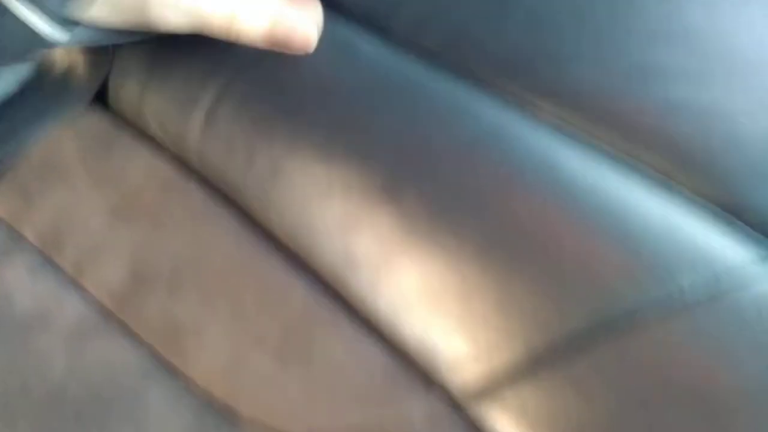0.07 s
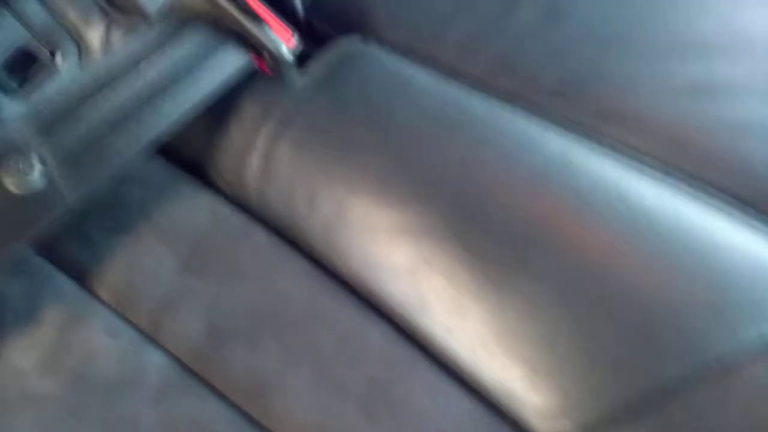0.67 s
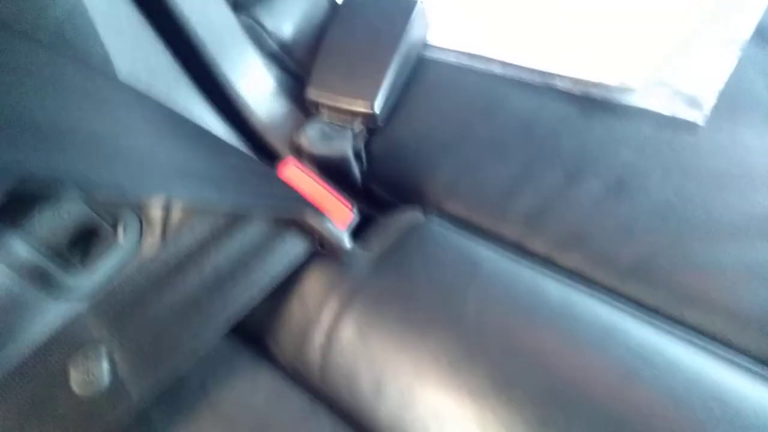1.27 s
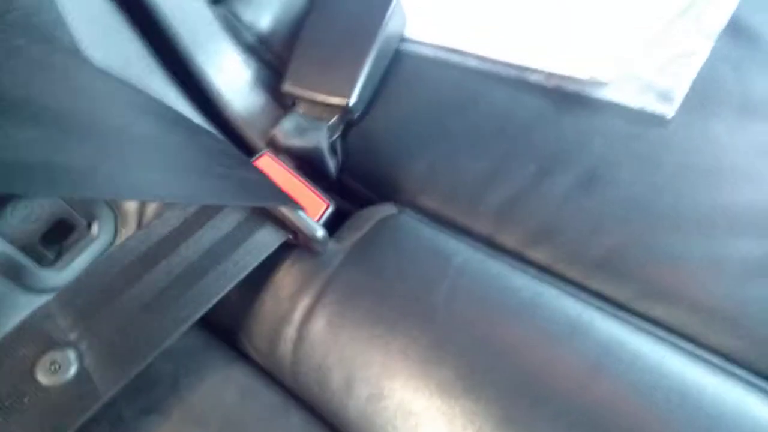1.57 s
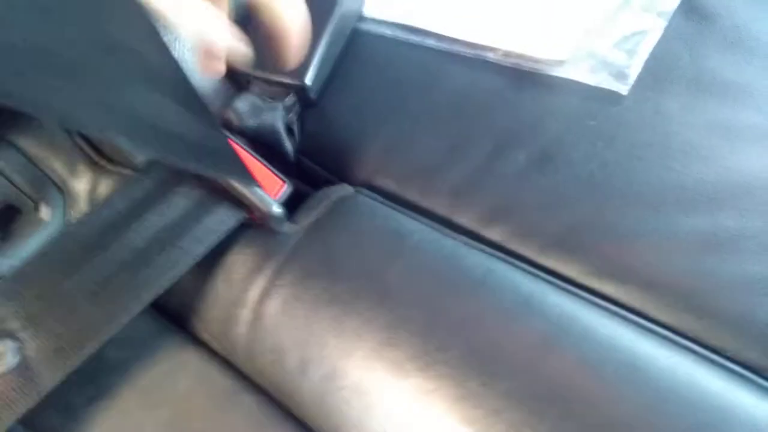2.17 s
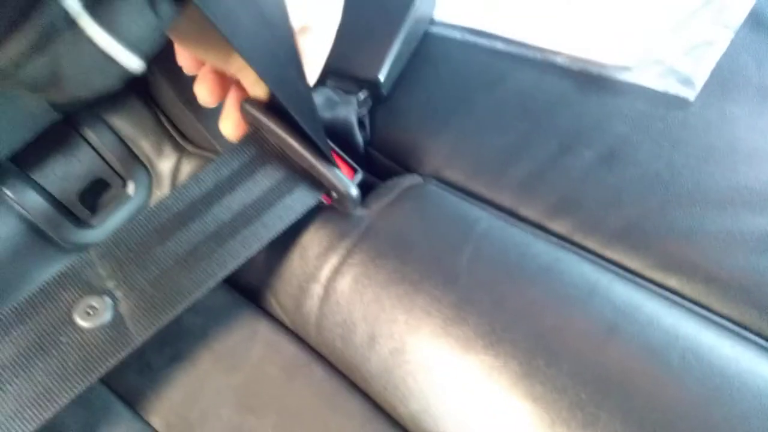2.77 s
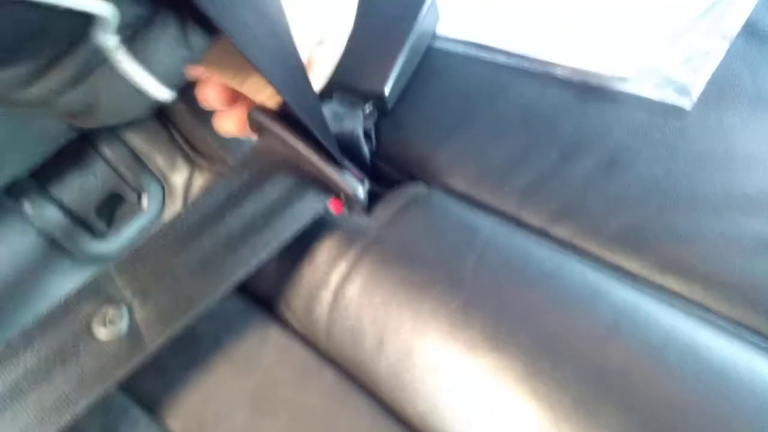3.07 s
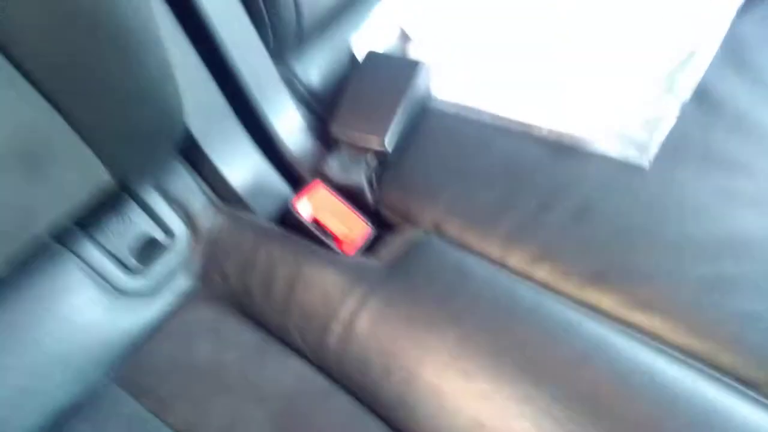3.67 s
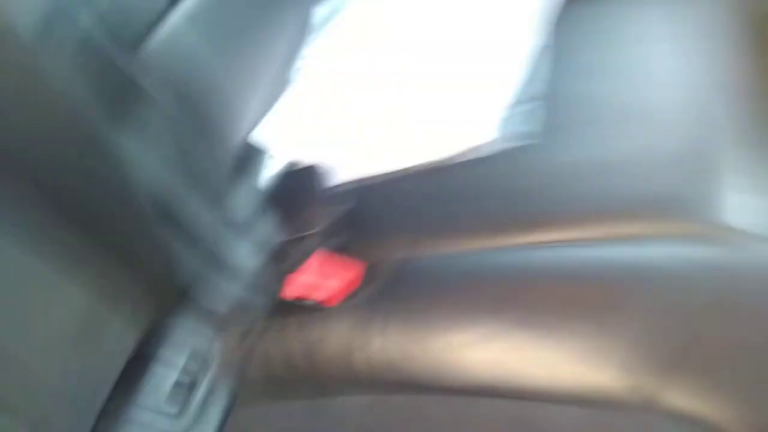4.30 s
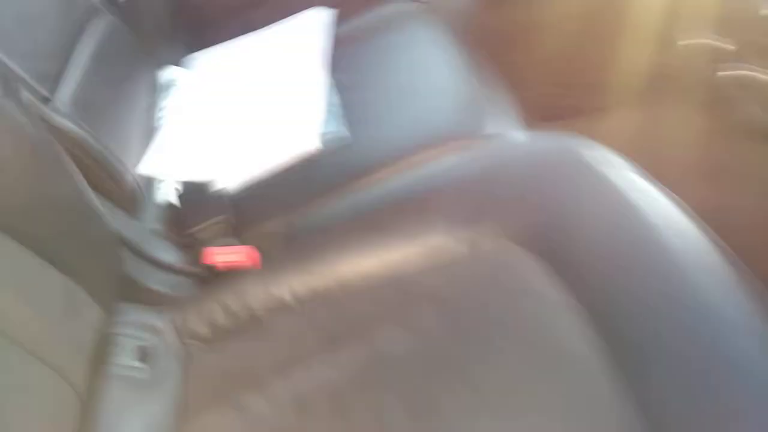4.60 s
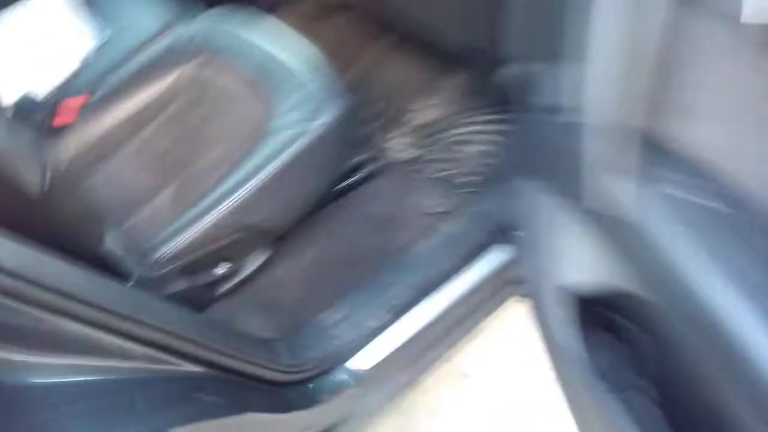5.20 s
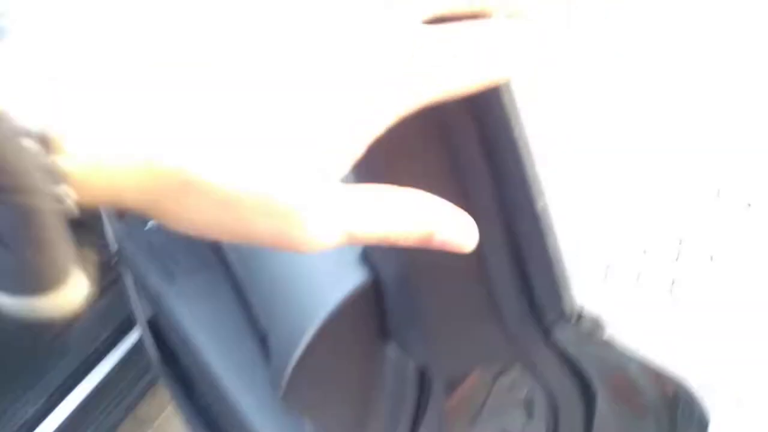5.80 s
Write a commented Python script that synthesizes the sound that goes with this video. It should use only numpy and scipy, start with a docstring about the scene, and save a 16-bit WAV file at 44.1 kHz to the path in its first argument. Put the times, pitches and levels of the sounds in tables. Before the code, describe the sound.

Inside a parked car, a seat belt latches with a sharp metallic click. The strap rustles as it is tugged, then the buckle releases in a cluster of clicks and the belt hisses back onto a briefly whirring reel, its tongue smacking the plastic trim. Clothes rustle as someone moves, and a finger rubs and taps the close microphone on the right, over a faint low outdoor rumble.

```python
"""Inside a parked car, a seat belt is latched, tugged and released. Its steel tongue clicks and rings in
the buckle, the woven strap hisses back onto a whirring reel, and the tongue smacks the plastic trim.
Then someone moves out of the car, clothes rustling, while a finger rubs and taps the right
microphone's opening (its port). A low outdoor rumble lies under it all."""
import sys
import numpy as np
from scipy import signal
from scipy.fft import rfft, irfft, next_fast_len
from scipy.io import wavfile
from scipy.ndimage import uniform_filter1d, map_coordinates

SR = 44100
rng = np.random.default_rng(int(sys.argv[2]) if len(sys.argv) > 2 else 0)


def store_wav(level_fs):
    """Save 16-bit WAV to argv[1]."""
    pcm = np.round(np.clip(np.atleast_2d(level_fs), -1, 1) * 32767)
    wavfile.write(sys.argv[1], SR, pcm.T.astype(np.int16))


N = 266805
TIME = np.arange(N) / SR
AGE = np.arange(SR // 4) / SR  # seconds since a hit

# Table levels are relative. A higher tilt_db is brighter; decay_s is the time to fade by 60 dB.
# Ringing tones of the steel tongue and latch: pitch_hz, level_db, decay_s
STEEL_TONES = [(2890, -3, 0.05), (3070, -6, .04), (3435, 2.5, 0.048), (4250, -6, 0.035), (4520, -4, 0.045),
               (4800, -1, 0.045), (5230, -1, 0.045), (5600, -5, 0.035), (5950, -7, 0.03), (6460, -2, 0.045),
               (6860, -6, 0.035), (7670, 1, 0.025), (7865, -2, 0.025), (8820, -11, 0.05), (9670, -12, 0.05)]
# Ringing tones of the hollow buckle case: pitch_hz, level_db, decay_s
CASE_TONES = [(1284, -2, 0.046), (1360, -3, .03), (1447, -5, 0.035), (1600, -11, .025)]
# Tone colour of the rubbing strap: pitch_hz, level_db
STRAP_COLOUR = [(300, -46.5), (1000, -24.5), (1800, -7.5), (2300, -6.5), (3200, -0.5), (4300, -2),
                (5500, -1), (7500, 1.5), (10000, -4), (13000, -12.5), (16000, -21)]
# Shifts of the body on the seat: start_s, length_s, rustle_db, growth_db, tilt_db, rumble_db
BODY_MOVES = [(0.0, 0.51, -62.5, -14, 2.5, -59.5), (0.312, 0.16, -50, 4, 0, -48.5),
              (0.521, 0.11, -62.5, 16, 2.5, -56.5), (1.617, 0.38, -81, 0, -3.5, -64.5),
              (2.012, 0.52, -60, -11, 1.5, -64), (3.058, 0.84, -55.5, 1.5, 2.5, -61),
              (4.006, .25, -56, -23, -5.5, -53), (4.723, 0.5, -55.5, -4, 6.5, -60),
              (4.912, 0.066, -52, -4, 6, -54), (5.158, 0.37, -59, 16.5, 4.5, -55),
              (5.54, 0.27, -54, 10, 2, -55.5), (5.804, 0.24, -57.5, 12.5, 0.5, -58)]
# Strength of the finger's rubbing: time_s, whistle_db, fizz_db, sizzle_db
FINGER_RUB = [(4.27, -52, -54, -68), (4.33, -59, -64.5, -59.5), (4.41, -68.5, -73, -68.5),
              (4.5, -66, -79.5, -66), (4.57, -62, -69.5, -55), (4.67, -62, -66.5, -57.5),
              (4.73, -56, -63, -60), (4.88, -55.5, -60.5, -59), (4.935, -49.5, -59, -47),
              (5.0, -53.5, -60, -57), (5.08, -55.5, -63, -60), (5.2, -62.5, -65.5, -80),
              (5.38, -61.5, -61.5, -63), (5.574, -64, -72, -78), (5.876, -73, -71, -86),
              (6.05, -73, -74, -82)]
MOVE_RISE_S, MOVE_FALL_S = 0.011, 0.023
TOUCH_S = 4.111  # the finger lands


def buckle_clicks():
    """Each contact snaps the latch, rings the steel and its case, and shakes the mounting."""
    # Steel hitting the latch: start_s, level_db, case_db, thud_db, tilt_db, decay_s, band_hz, boost_db
    clicks = [(0.015, -23.5, -55, -62, -1.5, 0.036, 2940, 9), (0.035, -18, -51, -47.5, -9, 0.14, 4200, 14),
              (0.0453, -1.5, -41, -45, 1, 0.004, 7300, 5), (0.047, -2.5, -44, -52, 0, 0.004, 4900, 9),
              (0.1996, 0, -28, -47, 3, 0.0045, 4340, 9), (0.2106, -16.5, -37.5, -52.5, -4, 0.016, 3435, 5),
              (2.8906, -20, -56, -56.5, 1, 0.015, 5750, 4),
              (2.911, -22, -39.5, -53.5, -3.5, 0.012, 5600, 5),
              (2.9573, -11, -43.5, -53, 0.5, 0.017, 5700, 15.5),
              (3.1172, -14, -38, -76, -1.5, 0.047, 4160, 11),
              (3.1217, -14, -33.5, -55, -2, 0.0067, 4170, 9), (3.129, -42, -38, -64, -4, 0.019, 3300, 5),
              (3.1586, -27.5, -42, -59, -5, 0.035, 4600, 2), (3.1674, -23, -36, -56.5, -5, 0.037, 4560, 5),
              (3.1934, -17.5, -34, -49, -3, 0.024, 5100, 1),
              (3.381, -13, -62, -49, -3.5, 0.0094, 4070, 8.5),
              (3.3824, -16, -59, -54, -4.5, 0.0064, 3130, 12)]
    # Tone colour of the snap: pitch_hz, level_db
    latch_colour = [(240, -49.5), (400, -27.5), (906, -17), (1290, -13), (1680, -10), (2100, -15),
                    (2600, -10.5), (3420, -5.5), (3750, -13), (4650, -8), (5870, -12), (7510, 1.5),
                    (8900, -15.5), (9610, -14), (12500, -19.5), (16000, -32.5)]
    band_octaves = 0.14  # each point of contact boosts one narrow band
    out = np.zeros((2, N))
    for start, db, case_db, thud_db, tilt_db, decay_s, band_hz, boost_db in clicks:
        boost = lambda hz: amp(boost_db * np.exp(-(np.log2((hz + 1) / band_hz) / band_octaves) ** 2))
        snap = colour(impact(decay_s, echo_db=-4, echo_s=0.062), latch_colour, tilt_db)
        snap = blow(filtered(snap, boost))
        steel = amp(-6) * blow(filtered(ring(STEEL_TONES, scatter_db=2.5), lambda hz: np.sqrt(boost(hz))))
        case = amp(case_db + 12) * ring(CASE_TONES, scatter_db=0)
        add(out, start, amp(db - 5) * (snap + steel) + case + amp(thud_db + 14.5) * thud(0.12))
    return out


def trim_knocks():
    """Hard parts knock on hollow plastic, whose ringing dies quickly."""
    # Hits on the trim: start_s, level_db, ring_db, thud_db, tilt_db, decay_s
    knocks = [(0.349, -46, -41, -54, -8, 0.015), (0.368, -32, -35, -50, 2, 0.02),
              (0.4405, -30, -39, -53, 3, 0.008), (1.2533, -39, -52, -58.5, -1.5, 0.04),
              (1.3213, -31, -50, -61, 5.5, 0.005), (3.9859, -34, -44, -57, 0.5, 0.014),
              (4.001, -37, -42.5, -62, 2, 0.081), (4.0103, -4.5, -6.5, -32.5, -2, 0.027),
              (4.047, -38, -32, -56, -10, 0.01), (4.0718, -34.5, -43, -50, -5, 0.0069),
              (4.103, -43, -42, -45, -12, 0.008), (4.134, -43, -45, -46, -8, 0.01),
              (5.628, -30.5, -58, -44, -1, 0.016), (5.695, -33, -64, -44, -2.5, 0.014),
              (5.928, -34.5, -41.5, -47, -5, 0.015)]
    # Tone colour of hollow plastic: pitch_hz, level_db
    plastic_colour = [(60, -38), (210, -7), (330, -2), (420, -10), (520, -1), (660, -9.5), (950, -5),
                      (1130, -10.5), (1320, -8.5), (1600, -8), (2000, -0.5), (2500, 2), (3000, 2),
                      (4000, -10.5), (5000, -8), (8000, -8.5), (12000, -20), (16000, -41.5)]
    # Ringing tones of the pillar trim: pitch_hz, level_db, decay_s
    panel_tones = [(511, -1.5, .045), (585, -2.5, .035), (664, 3.5, .05), (735, -6, .05), (920, -1.5, .045),
                   (1010, -7, .035), (1305, -1, .04), (1400, -6, .06), (1805, -4, .06), (1985, -4, .07),
                   (2420, -7, .045), (2600, -3, .04), (2970, -5, .05)]
    out = np.zeros((2, N))
    for start, db, ring_db, thud_db, tilt_db, decay_s in knocks:
        knock = blow(colour(impact(decay_s, echo_db=-2.5, echo_s=0.061), plastic_colour, tilt_db))
        panel = cut_bass(ring(panel_tones, scatter_db=2.5), below_hz=200)
        add(out, start, amp(db + 1) * knock + amp(ring_db + 2.5) * panel + amp(thud_db + 11) * thud(0.5))
    return out


def strap_slide():
    """The weave rasps through its guide loop, brighter when it runs faster."""
    # Runs of the strap: start_s, length_s, level_db, growth_db, guide_db
    pulls = [(0.0, 0.35, -58.5, 18, -11), (0.274, 0.23, -56, 5, -36), (0.539, 0.067, -50, 5.5, -9),
             (0.682, 0.13, -65.5, -6, -4.5), (1.21, 0.28, -70, 0.5, -2), (1.498, 0.11, -87.5, 5.5, 12),
             (1.647, 0.3, -56.5, -2.5, -6), (1.998, 0.54, -53.5, -14, -9), (2.872, 0.16, -58, 2.5, -13),
             (3.107, 0.36, -51, 4.5, -6), (3.483, 0.4, -51.5, 13.5, -23), (3.982, 0.29, -60.5, -4, -14)]
    runs = np.array([stroke(*pull[:4], rise_s=0.017, fall_s=0.024) for pull in pulls])
    slide = runs.sum(axis=0)
    guide = amp([pull[-1] for pull in pulls]) @ runs
    weave = stereo_noise(0.14) * amp(2 * wobble(600)) * catches(per_s=90, size_db=2.6)
    rasp = unit(colour(weave, STRAP_COLOUR))
    dull = filtered(rasp, lambda hz: 1 / (1 + (hz / 6000) ** 4))
    speed_db = np.clip(20 * np.log10(slide) + 59, -15, 10)
    loop = stereo_noise(0.39) * catches(per_s=60, size_db=2.2)
    loop = unit(filtered(loop, lambda hz: 1 / (1 + ((hz - 2850) / 750) ** 4)))
    flicker = amp(0.6 * wobble(30))
    brightness = amp(0.04 * speed_db + 0.39 * wobble(8.5))
    return flicker * (slide * (dull + brightness * (rasp - dull)) + guide * loop)


def strap_snags():
    """Strap and cloth scuff briefly, and single threads snag in the guide."""
    # Short scuffs: middle_s, level_db, length_s, tilt_db
    scuffs = [(0.332, -47, 0.0092, -5), (0.372, -42, 0.014, -3.5), (0.443, -42, 0.005, -5),
              (0.463, -52, 0.035, -2.5), (0.696, -56, 0.013, 13), (1.653, -51, 0.018, 3),
              (1.83, -53.5, 0.014, 0.5), (2.052, -50.5, 0.025, 2), (2.47, -51.5, 0.022, -7),
              (3.087, -52, 0.028, 0.5), (3.844, -46, 0.0081, -2), (3.874, -44, 0.016, -10),
              (5.559, -47, 0.047, -11), (5.964, -50.5, 0.0071, 1)]
    # Snagging threads: start_s, level_db
    snags = [(1.652, -42.5), (1.714, -38), (2.461, -35), (3.445, -40.5), (3.529, -43.5), (3.692, -47),
             (3.874, -39)]
    out = np.zeros((2, N))
    for middle, db, length, tilt_db in scuffs:
        grains = rng.standard_normal((2, len(AGE))) * amp(3.2 * wobble(495.8, size=len(AGE)))
        scuff = swell(length) * unit(colour(grains, STRAP_COLOUR, tilt_db))
        add(out, middle - AGE.mean(), amp(db + 1.5) * scuff)
    for start, db in snags:
        snag = colour(impact(0.015, echo_db=-5, echo_s=0.065), STRAP_COLOUR, tilt_db=-4)
        add(out, start - .001, amp(db + 0.5) * blow(snag))
    return out


def reel_whirr():
    """The spring-loaded reel whirrs, its pitch settling as it takes up the slack."""
    # Spins of the reel: start_s, length_s, level_db, growth_db, first_hz, settled_hz
    spins = [(0.199, 0.048, -44, -6, 235, 170.5), (0.444, 0.093, -49, -10, 228, 111.6),
             (2.956, 0.062, -49, -6.5, 322, 164), (3.122, 0.18, -48, -1.5, 295, 173.1),
             (3.402, 0.065, -52, -7, 260, 125)]
    settle_s = 0.019
    out = np.zeros(N)
    flutter, shake = 1 + .08 * wobble(110), amp(2 * wobble(50))
    for start, length, db, growth_db, first_hz, settled_hz in spins:
        pitch = settled_hz + (first_hz - settled_hz) * np.exp(-np.maximum(TIME - start, 0) / settle_s)
        phase = 2 * np.pi * np.cumsum(pitch * flutter) / SR
        whirr = np.sin(phase) + amp(-13) * np.sin(3 * phase)
        out += stroke(start, length, db, growth_db, rise_s=0.0017, fall_s=0.028) * whirr
    return shake * out


def latch_grind():
    """When pulled, the tongue shifts in the latch, so steel and case sing faintly."""
    # Shifts of the tongue: start_s, length_s, level_db
    strains = [(1.236, 0.21, -77), (2.647, 0.018, -65), (2.7, 0.025, -64.5), (2.741, 0.162, -75.5),
               (2.872, 0.14, -61)]
    load = sum(stroke(*strain, growth_db=0, rise_s=0.006, fall_s=0.0091) for strain in strains)

    def resonance(hz):
        tones = STEEL_TONES + CASE_TONES
        peaks = sum(amp(db) / (1 + ((hz - pitch) * decay_s / 4) ** 2) for pitch, db, decay_s in tones)
        return peaks * hz / (hz + 900) / (1 + (hz / 5500) ** 4)
    return load * amp(1.6 * wobble(45)) * unit(filtered(stereo_noise(0.23), resonance))


def clothes_rustle():
    """With each shift of the body, sleeves brush over the seats in uneven grains."""
    # Tone colour of cloth: pitch_hz, level_db
    cloth_colour = [(100, 0), (300, -2), (600, 4.5), (1000, 3.5), (2000, -3), (4000, -1.5), (8000, -4.5),
                    (16000, -30.5)]
    grains = stereo_noise(0.34) * amp(wobble(490) + 0.78 * wobble(23))
    out = np.zeros((2, N))
    for start, length, db, growth_db, tilt_db, _ in BODY_MOVES:
        near = np.abs(TIME - start - length / 2) < length / 2 + .2
        gain = stroke(start, length, db, growth_db, MOVE_RISE_S, MOVE_FALL_S)
        out[:, near] += gain[near] * unit(colour(grains[:, near], cloth_colour, tilt_db))
    return out


def squeaks():
    """Leather and trim stick and slip for a moment, singing a few rough tones."""
    # Squeaky rubs: middle_s, level_db, length_s, pitch_hz
    rubs = [(0.697, -58, 0.016, 1740), (1.715, -49, 0.0054, 2040), (3.875, -56, 0.011, 1830),
            (5.537, -43, 0.0035, 1970), (5.571, -46.5, 0.027, 1980), (5.736, -47, 0.0017, 1920)]
    # Tones of a squeak: pitch_multiple, level_db, half_width_hz
    tones = [(1, 0, 129), (1.57, 1.5, 175), (2.03, -14.5, 300), (2.87, -6.5, 350)]
    out = np.zeros((2, N))
    for middle, db, length, pitch_hz in rubs:
        slips = rng.standard_normal(len(AGE)) + 0.25 * rng.standard_normal((2, len(AGE)))
        slips *= amp(2.4 * wobble(498, size=len(AGE)))
        peaks = lambda hz: sum(amp(level) / (1 + ((hz - multiple * pitch_hz) / width) ** 2)
                               for multiple, level, width in tones)
        add(out, middle - AGE.mean(), amp(db + 3) * swell(length) * unit(filtered(slips, peaks)))
    return out


def finger_taps():
    """Each tap on the right port is a dry tick and a push of air that rings the shell around it."""
    # Finger taps: start_s, tick_db, push_db
    taps = [(4.143, -48, -34.5), (4.2, -38, -30.5), (4.2057, -24, -17.5), (4.226, -26, -45),
            (4.2443, -5, -24), (4.291, -31, -38), (4.64, -56.5, -40), (4.726, -40, -38), (4.814, -50, -36),
            (4.888, -47, -36), (4.98, -34, -44), (5.1345, -18, -25.5), (5.1943, -11.5, -28),
            (5.2283, -14, -23), (5.443, -36, -34), (5.843, -29, -70)]
    # Tone colour of a tick: pitch_hz, level_db
    tick_colour = [(200, -25), (900, -4.5), (2800, -3), (4500, 2.5), (6000, 7), (9000, 0.5), (12000, -6),
                   (16000, -22)]
    # Ringing tones of the small hollow shell: pitch_hz, level_db, decay_s
    shell_tones = [(533, 0.5, 0.019), (950, 1, 0.017), (1350, -7, .012), (1980, -4, 0.011)]
    push_s = 0.0012
    pulse = (1 - AGE / push_s) * np.exp(-AGE / push_s) * onset(0.00037)
    out = np.zeros(N)
    for start, tick_db, push_db in taps:
        tick = colour((AGE == 0) + 0.13 * burst(0.0082), tick_colour)
        push = colour(pulse + 0.22 * burst(0.028), [(1400, 6), (3000, -15.5), (8000, -34)])
        shell = ring(shell_tones, scatter_db=0.5)
        for db, part in (tick_db, tick), (push_db, push), (push_db - 4, shell):
            add(out, start, amp(db) * part / np.abs(part).max())
    return on_right(out, left_db=-28)


def finger_rub():
    """Sliding skin fizzes and makes the right port whistle, the pitch shifting as it is covered."""
    # Whistle of the half-covered port: time_s, pitch_hz
    port_pitch = [(4.25, 6570), (4.6, 6365), (4.95, 5986), (5.5, 6060)]
    # Tone colour of rubbing skin: pitch_hz, level_db
    fizz_colour = [(100, -6), (500, 4.5), (1200, 1.5), (3000, -0.5), (5000, -1.5), (8500, 1), (11000, 0.5),
                   (13500, -10), (16000, -16)]
    # Tone colour of its highest treble: pitch_hz, level_db
    sizzle_colour = [(4000, -38), (7000, -16), (10000, -5.5), (12000, 1), (16000, -5.5)]
    press_s = 0.26
    contact = np.clip((TIME - TOUCH_S) / press_s, 0, 1)
    band = filtered(rng.standard_normal((2, N)), lambda hz: 1 / (1 + (hz / 850) ** 2))
    phase = 2 * np.pi * np.cumsum(curve(port_pitch)) / SR
    whistle = unit(band[0] * np.cos(phase) + band[1] * np.sin(phase))  # noise moved up to that pitch
    fizz = unit(colour(rng.standard_normal(N) * amp(1.5 * wobble(990)), fizz_colour))
    sizzle = unit(colour(rng.standard_normal(N) * amp(1.5 * wobble(990)), sizzle_colour))
    rub = (amp(curve(FINGER_RUB) + 9.5) * whistle
           + amp(curve(FINGER_RUB, column=2) + 12) * fizz
           + amp(curve(FINGER_RUB, column=3) + 2) * sizzle)
    return on_right(contact ** 2 * amp(1.65 * wobble(40)) * rub, left_db=-36)


def skin_pops():
    """The sliding finger sticks and slips in soft, dull pops."""
    pops_per_s = 60
    slips = (rng.random(N) < pops_per_s / SR) * rng.random(N) * (TIME > TOUCH_S)
    pops = unit(colour(slips, [(40, -18), (130, -1.5), (300, -12), (800, -18.5), (3000, -65.5)]))
    return on_right(amp(curve(FINGER_RUB) - 7) * pops, left_db=-24)


def skin_bumps():
    """Skin bumps softly against the right port and brushes away."""
    # Soft bumps: start_s, level_db
    bumps = [(0.9815, -35), (0.995, -37), (0.9997, -38), (1.005, -34)]
    # Their dull tone colour: pitch_hz, level_db
    dull_colour = [(60, -2), (130, 3), (300, -1), (800, -4.5), (1600, -7), (2300, -23), (3200, -42),
                   (6000, -62), (12000, -75)]
    out = np.zeros(N)
    for start, db in bumps:
        bump = blow(colour((AGE == 0) + 0.12 * burst(0.016), dull_colour))
        brush = blow(colour(burst(0.35), dull_colour))
        add(out, start, amp(db) * (bump + amp(-19) * brush))
    return on_right(out, left_db=-36)


def cabin_rumble():
    """Low outdoor rumble fills the car and swells whenever someone shifts on the seat."""
    # Tone colour of the rumble: pitch_hz, level_db
    rumble_colour = [(25, -14.5), (45, -7.5), (75, 6), (120, -3), (190, -4), (300, -10.5), (550, -16.5),
                     (850, -39), (2000, -52.5), (8000, -66.5)]
    steady_db = -63.5
    shifts = sum(stroke(start, length, db, 0, MOVE_RISE_S, MOVE_FALL_S) ** 2
                 for start, length, *_, db in BODY_MOVES)
    level = np.sqrt(amp(steady_db) ** 2 + shifts) * amp(1.9 * wobble(26))
    return level * unit(colour(stereo_noise(0.72), rumble_colour)) * amp([[-2], [1]])


def microphone_hiss():
    """The microphones make a faint noise of their own."""
    return amp(-88.5) * unit(filtered(stereo_noise(0), lambda hz: 1 / (1 + (hz / 6000) ** 2)))


def impact(decay_s, echo_db, echo_s):
    """A brief chatter of contact, then dense echoes from the padded cabin, which soaks up treble."""
    direct = even(burst(decay_s) * onset(0.0011))
    echoes = rng.standard_normal((2, len(AGE))) * fade(echo_s) * onset(0.00049)
    echoes = blow(np.array([even(side) for side in echoes]))
    return blow(direct) + amp(echo_db) * colour(echoes, [(5000, 0), (7500, -2.5), (12000, -1)])


def ring(tones, scatter_db):
    """A struck part rings in its own tones, their strengths varied at random by scatter_db."""
    out = np.zeros(len(AGE))
    for hz, db, decay_s in tones:
        gain = amp(db + rng.normal(0, scatter_db)) * fade(decay_s)
        out += gain * np.sin(2 * np.pi * (hz * rng.normal(1, 0.00083) * AGE + rng.random()))
    return blow(out * onset(0.00064))


def thud(decay_s):
    """Seat and body panels answer a hit with a soft, low thud."""
    # Tone colour of the mounting: pitch_hz, level_db
    seat_colour = [(25, -41.5), (50, -14), (80, -2.5), (130, -1.5), (210, -5.5), (300, -2.5), (420, -12),
                   (1200, -39.5), (4000, -90.5)]
    return blow(colour(burst(decay_s), seat_colour))


def catches(per_s, size_db):
    """Gain of a rubbing surface: threads catch and let go within a few milliseconds."""
    snags = (rng.random(N) < per_s / SR) * rng.exponential(1, N)
    return amp(size_db * np.minimum(signal.fftconvolve(snags, np.exp(-AGE / 0.0012))[:N], 2))


def stroke(start, length, db, growth_db, rise_s, fall_s):
    """Gain of one movement: it sets in, grows or eases while it lasts, and dies away."""
    near = (TIME > start - 10 * rise_s) & (TIME < start + length + 10 * fall_s)
    age, gain = TIME[near] - start, np.zeros(N)
    edges = np.logaddexp(0, -age / rise_s) + np.logaddexp(0, (age - length) / fall_s)
    gain[near] = amp(db + growth_db * (np.clip(age / length, 0, 1) - .5)) * np.exp(-edges)
    return gain


def nearby_walls(x, echo_db):
    """Seat backs, glass and roof send back weak, quick echoes, different on each side."""
    delays_s = rng.uniform(.0007, .008, (6, 2, 1))
    return x + amp(echo_db) * filtered(x, lambda hz: np.exp(-2j * np.pi * hz * delays_s).sum(axis=0))


def through_air(x, lead_s):
    """Sound reaches the two ports with different tone colours, the left one first."""
    # Balance between the ports: pitch_hz, left_minus_right_db
    balance = [(100, 1.5), (400, -4), (900, -0.5), (1300, -1.5), (2000, -0.5), (3400, -9), (5500, -8.5),
               (8000, -2.5), (10000, 7), (15000, 7)]
    side = np.array([[.5], [-.5]])
    return filtered(x, lambda hz: amp(along(balance, hz) * side) * np.exp(2j * np.pi * hz * lead_s * side))


def on_right(x, left_db):
    """A touch on the right port is only faint on the left."""
    return x * amp([[left_db], [0]])


def amp(db):
    """Decibels to gain."""
    return 10 ** (np.asarray(db) / 20)


def unit(x):
    """Scales to an average (rms) level of 1."""
    return x / np.sqrt(np.mean(x ** 2) + 1e-20)


def blow(x):
    """Scales a hit to the energy of one millisecond at level 1."""
    return unit(x) * np.sqrt(SR / 1000 / x.shape[-1])


def onset(rise_s):
    """The quick rise of a hit."""
    return 1 - np.exp(-AGE / rise_s)


def fade(decay_s):
    """The dying away of a hit."""
    return np.exp(-np.log(1000) * AGE / max(decay_s, 1e-3))


def burst(decay_s):
    """A fading puff of noise."""
    return rng.standard_normal(len(AGE)) * fade(decay_s)


def swell(length):
    """A bell-shaped rise and fall."""
    return np.exp(-((AGE - AGE.mean()) / length) ** 2 * 2)


def stereo_noise(share):
    """White noise, with this share of its power common to both sides."""
    return np.sqrt(share) * rng.standard_normal(N) + np.sqrt(1 - share) * rng.standard_normal((2, N))


def wobble(per_s, size=N):
    """A smooth curve through per_s random values a second."""
    return map_coordinates(rng.standard_normal(int(size * per_s / SR) + 4), [TIME[:size] * per_s])


def curve(rows, column=1):
    """Joins timed points into one value per sample."""
    rows = np.asarray(rows)
    return np.interp(TIME, rows[:, 0], rows[:, column])


def along(points, hz):
    """Reads between (pitch_hz, value) points, spaced by octaves."""
    pitches, values = np.transpose(points)
    return np.interp(np.log(hz + 1), np.log(pitches), values)


def filtered(x, response):
    """Multiplies each frequency in x by response(hz)."""
    size = x.shape[-1]
    padded = 2 * next_fast_len(size // 2 + 2048)
    return irfft(rfft(x, padded) * response(np.fft.rfftfreq(padded, 1 / SR)), padded)[..., :size]


def colour(x, points, tilt_db=0):
    """Gives x a tone colour from (pitch_hz, level_db) points, tilted around 3 kHz."""
    def response(hz):
        level_db = along(points, hz) + tilt_db * np.log2((hz + 1200) / 4200)
        cepstrum = irfft(np.log(amp(level_db)))
        # Folding this in half makes the filter ring after a hit, never before it.
        cepstrum[1:len(cepstrum) // 2] *= 2
        cepstrum[len(cepstrum) // 2 + 1:] = 0
        return np.exp(rfft(cepstrum))
    return filtered(x, response)


def even(x):
    """Evens out a noise burst: a hard contact feeds all frequencies about equally."""
    hz = np.fft.rfftfreq(len(x), 1 / SR)
    strength = unit(uniform_filter1d(uniform_filter1d(np.abs(rfft(x)), size=24), size=24))
    return colour(x, np.c_[hz + 1, -20 * np.log10(strength + .15)])


def add(track, start_s, x):
    """Mixes x into the track from start_s."""
    first = max(round(start_s * SR), 0)
    part = track[..., first:first + x.shape[-1]]
    part += x[..., :part.shape[-1]]


def scene():
    """Hard parts and sliding fabric sound through the air; touches act on one port directly."""
    hard = through_air(buckle_clicks() + latch_grind() + trim_knocks() + reel_whirr(), lead_s=.00022)
    soft = strap_slide() + strap_snags() + squeaks() + clothes_rustle()
    soft = through_air(nearby_walls(soft, echo_db=-18.5), lead_s=.0004)
    hiss = microphone_hiss()
    touches = finger_rub() + skin_pops() + skin_bumps() + finger_taps()
    return hard + soft + touches + cabin_rumble() + hiss


def cut_bass(x, below_hz):
    """Gently removes the low end."""
    return filtered(x, lambda hz: (1j * hz / (1j * hz + below_hz)) ** 2)


def record(dry):
    """Small microphones lose the deep bass; the highest peaks are rounded and the top treble is cut."""
    ceiling, top_hz = .95, 16000
    sound = cut_bass(dry, below_hz=32)
    sound = sound / (1 + np.abs(sound / ceiling) ** 6) ** (1 / 6)
    return filtered(sound, lambda hz: 1 / np.sqrt(1 + (hz / top_hz) ** 160))


dry = scene()
out = record(dry)
store_wav(out)
```